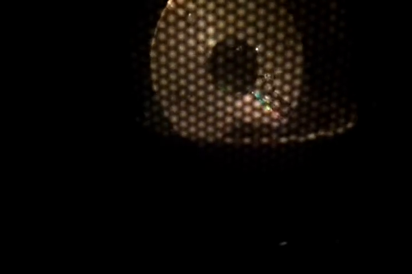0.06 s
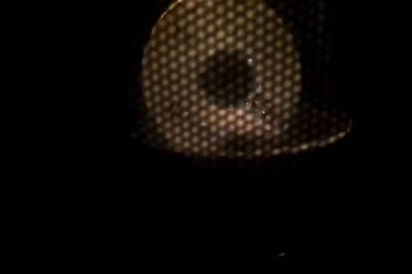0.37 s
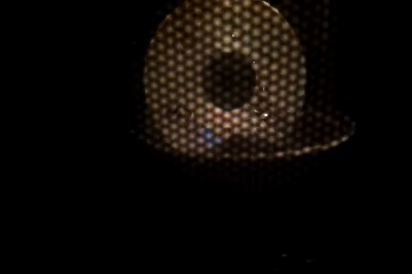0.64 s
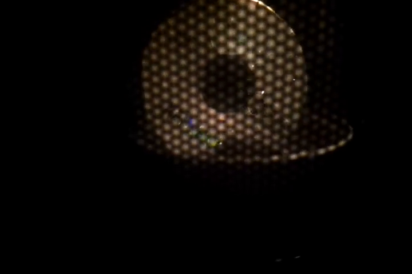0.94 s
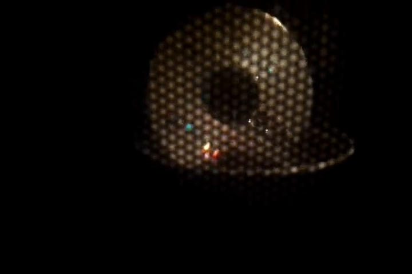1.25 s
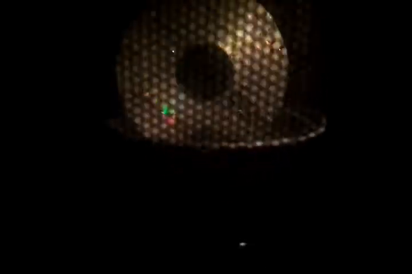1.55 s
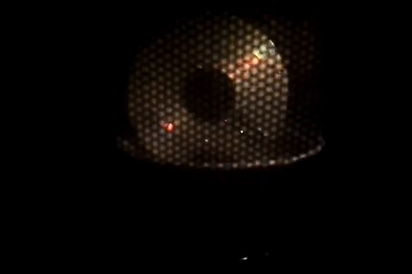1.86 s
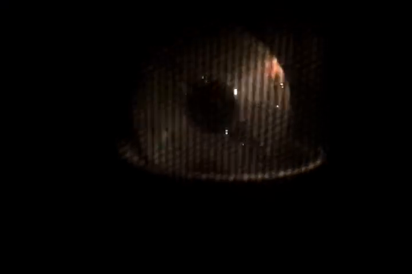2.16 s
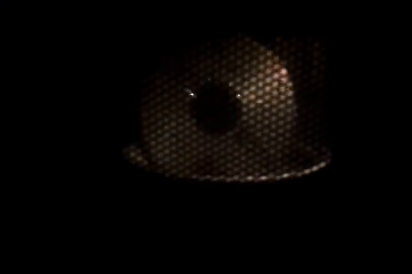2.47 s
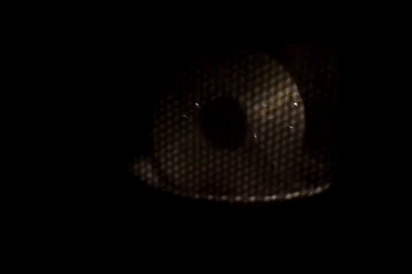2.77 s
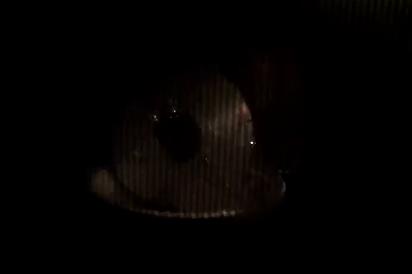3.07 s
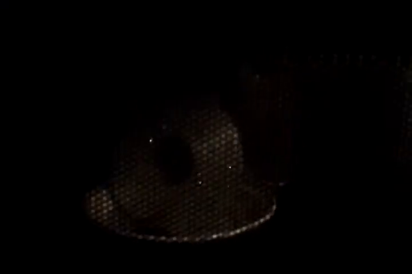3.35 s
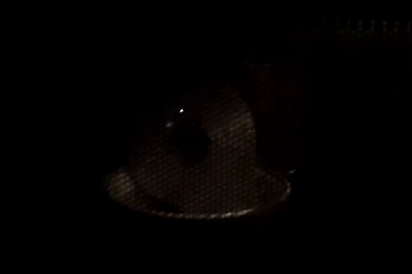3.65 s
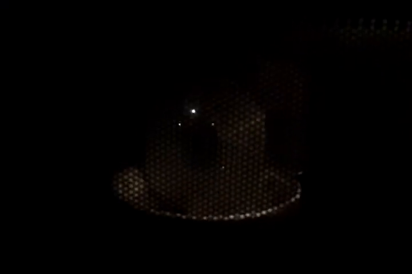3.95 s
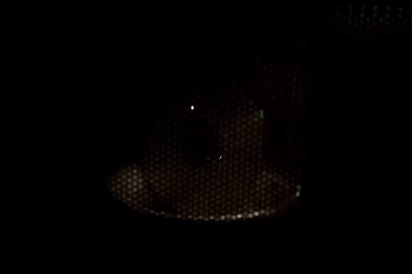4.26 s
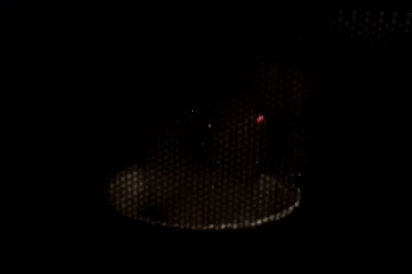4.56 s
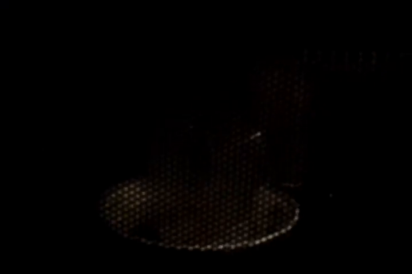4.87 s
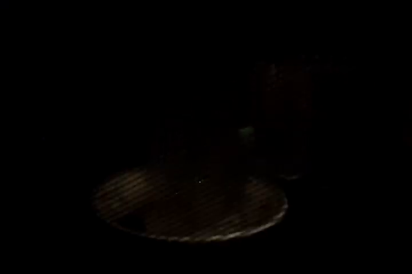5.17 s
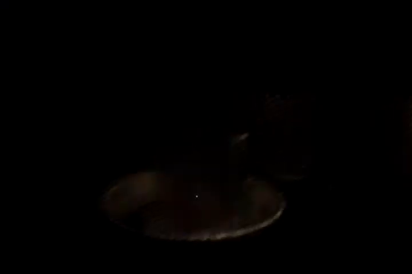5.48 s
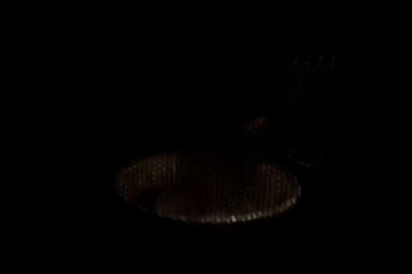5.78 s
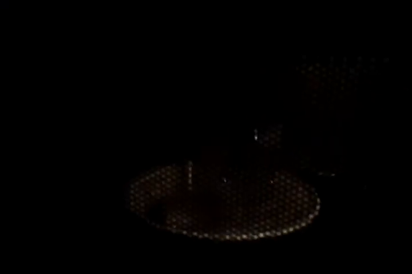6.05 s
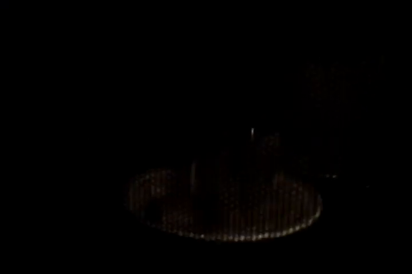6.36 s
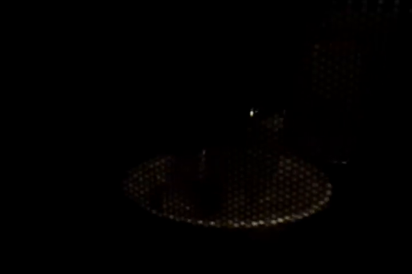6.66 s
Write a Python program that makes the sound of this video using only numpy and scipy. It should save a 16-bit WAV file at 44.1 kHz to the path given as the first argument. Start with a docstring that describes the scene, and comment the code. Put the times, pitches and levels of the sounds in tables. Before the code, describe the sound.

Close to a running microwave oven in a room, a low buzzing hum and the airy noise of the fan continue throughout. Two quick clusters of thin, hissy cracks come from a disc sparking inside, each ringing briefly in the metal cavity. Soft sizzling and a few separate crackles follow, with a single plastic snap. The hum shifts slightly in tone as the microphone moves back, and the crackling stops.

```python
"""A disc in a microwave oven

Heard close to the door, the transformer hums on the 50 Hz mains. The cooling fan adds its own tones
and a rush of air, coloured by the casing. As the magnetron (the part that makes the microwaves) fires,
sparks crackle in the optical disc's metal film and ring on in the steel cavity. The hot plastic snaps."""
import sys
import numpy as np
from scipy import signal
from scipy.fft import rfft, irfft, next_fast_len
from scipy.io import wavfile

SR = 44100
rng = np.random.default_rng(int(sys.argv[2]) if len(sys.argv) > 2 else 0)


def to_wav(s):
    """Save 16-bit WAV."""
    ch = np.atleast_2d(s).T  # columns
    pcm = np.round(np.clip(ch, -1, 1) * 32767)  # PCM
    wavfile.write(sys.argv[1], SR, pcm.astype(np.int16))


N = 305172
TIME = np.arange(N) / SR
FFT_SIZE = next_fast_len(N, True)
BINS_HZ = np.maximum(np.fft.rfftfreq(FFT_SIZE, 1 / SR), 1)
MAINS_HZ = 50.01
CAVITY_RING_S = 0.19   # time to fade by 60 dB

# how far the listener has moved back from the door: t/s, share of the way (0-1)
RETREAT = [(0, 0), (2.8, 0), (3.7, 0.6), (4.5, 0.37), (5.7, 1), (6.92, 0.52)]


def from_db(db):
    """Turn decibels into a gain."""
    return 10 ** (np.asarray(db) / 20)


def rms_one(x):
    """Scale a signal so that its average size (rms) is 1."""
    return x / np.sqrt(np.mean(x ** 2) + 1e-20)


def in_time(points):
    """Join (time, value) points with straight lines, one value a sample."""
    return np.interp(TIME, *np.transpose(points))


def spectrum_db(points):
    """Join (frequency, level) points with straight lines on an octave scale."""
    hz, db = np.transpose(points)
    return np.interp(np.log(BINS_HZ), np.log(hz), db)


def noise(colour_db):
    """Noise with the given level, in dB per Hz, at each frequency."""
    white = rng.standard_normal(FFT_SIZE)
    return irfft(rfft(white) * from_db(colour_db), FFT_SIZE)[:N] * np.sqrt(SR / 2)


def bell(hz, width_hz):
    """The bell-shaped power curve of one resonance, 1 at its peak."""
    return 1 / (1 + (2 * (BINS_HZ - hz) / width_hz) ** 2)


def drift(rate_hz):
    """A smooth random wobble of size about 1; a higher rate moves faster."""
    hop, warm_up = 100, 2000
    pole = np.exp(-2 * np.pi * rate_hz * hop / SR)
    white = rng.standard_normal(N // hop + warm_up + 2)
    smooth = signal.lfilter([1], [1, -2 * pole, pole * pole], white)[warm_up:]
    return np.interp(np.arange(N) / hop, np.arange(len(smooth)), rms_one(smooth))


def tone(turns, multiple, db):
    """A pure tone that swings `multiple` times a turn, from a random starting point."""
    return np.sqrt(2) * from_db(db) * np.sin(2 * np.pi * (multiple * turns + rng.random()))


def dying(age, ring_s):
    """A gain that jumps to 1 at age 0, then fades by 60 dB in ring_s."""
    return (age >= 0) * from_db(-60 * np.clip(age / ring_s, 0, 2))


def spell(start, length, rise_s, fall_s):
    """A gain that rises to 1 at the start, holds, and falls once the length is over."""
    return np.clip((TIME - start) / rise_s, 0, 1) * np.clip(1 - (TIME - start - length) / fall_s, 0, 1)


def lift(x, hz, width_hz, db):
    """Turn one broad band up or down by an amount that changes over time."""
    band = irfft(rfft(x, FFT_SIZE) * bell(hz, width_hz), FFT_SIZE)[:N]
    return x + (from_db(db) - 1) * band


def transformer(waver_db=1.24, gain_db=0.7):
    """The iron core shakes the casing at multiples of the mains; the high tones waver most."""
    # tones of the hum: multiple of the mains, level/dB
    hum_tones = [(1, -53.5), (3, -38), (4, -49.5), (5, -52.5), (7, -64), (8, -52.5), (10, -55), (11, -69.5),
                 (12, -64), (16, -56.5), (18, -62), (20, -62), (22, -56), (28, -64.5), (32, -60), (35, -63),
                 (36, -69.5), (38, -67.5), (39, -70.5), (40, -67), (41, -68.5), (44, -67), (46, -75),
                 (50, -79.5), (61, -80.5), (64, -75.5), (75, -73.5)]
    # standing waves in the room: multiple of the mains, level at the door/dB, change all the way back/dB
    room_tones = [(2, -54, -13), (6, -44, 2), (14, -45.5, -9)]
    turns = MAINS_HZ * TIME
    retreat = in_time(RETREAT)
    hum = sum(tone(turns, k, db + waver_db * np.log10(k) * drift(2.1)) for k, db in hum_tones)
    standing = sum(tone(turns, k, db + change_db * retreat) for k, db, change_db in room_tones)
    return from_db(gain_db) * (hum + standing)


def fan(turns_per_s=40.44, speed_wobble=0.000691, flutter_db=2.5):
    """The motor lags behind the mains, so its blade tone beats against the hum."""
    # fan tones, strongest on multiples of four: multiple of the turning rate, level/dB
    fan_tones = [(3, -63), (4, -48.5), (8, -50.5), (12, -49), (16, -64.5), (18, -64.5), (20, -50.5),
                 (22, -62), (24, -64.5), (28, -54.5), (29, -57.5), (36, -59.5)]
    speed = turns_per_s * (1 + speed_wobble * drift(0.58))
    turns = np.cumsum(speed) / SR
    return sum(tone(turns, k, db + flutter_db * np.log10(k) * drift(4.6)) for k, db in fan_tones)


def rippled_noise(colour_db, spots=6, ripple_db=2.55, step_hz=35, treble_hz=1600):
    """Echoes put fine peaks and dips in the treble, different at each spot the listener passes."""
    depth_db = ripple_db * BINS_HZ ** 2 / (BINS_HZ ** 2 + treble_hz ** 2)
    out = np.zeros(N)
    for here in np.eye(spots):
        heights = rng.standard_normal(4000)
        ripple = np.interp(BINS_HZ / step_hz, np.arange(len(heights)), heights)
        share = np.interp(TIME, np.linspace(0, TIME[-1], spots), here)   # fade from spot to spot
        out += np.sqrt(share) * noise(colour_db + depth_db * ripple)
    return out


def air(buzz_db=0.07, gain_db=-0.33, fade_s=0.23, dull_from_s=5.9):
    """Air swirls through the casing, shaken twice a mains cycle; its colour shifts as the listener moves."""
    # rush of the cooling air: f/Hz, level/dB per Hz
    rush_colour = [(25, -88), (60, -77), (88, -79.5), (135, -71.5), (350, -68), (660, -75), (1000, -73.5),
                   (1550, -78.5), (1900, -78.5), (2800, -84.5), (4700, -88.5), (6500, -90.5), (7300, -99),
                   (8000, -121)]
    # a narrow low throb beside the hum (136 Hz), then resonances of the casing and air duct:
    # f/Hz, width/Hz, boost/dB
    peaks = [(136, 5.6, 9.5), (222.5, 20, 4.5), (408, 27, 0.5), (459, 73, 5.5), (536, 39, 3.5),
             (615, 33, 7.5), (727, 64, 8), (807, 62, 6.5), (925, 76, 5.5), (1113, 73, 3.5),
             (1430, 332, 8.5), (1510, 99, 2), (2560, 34, 5), (3520, 180, 2)]
    # swells in the whirr of the duct: start/s, length/s, boost/dB
    swells = [(2.1, .9, 3.0), (5.1, 1, 2.0)]
    peaks_db = sum(db * bell(hz, width_hz) for hz, width_hz, db in peaks)
    swell_db = sum(db * spell(start, length, fade_s, fade_s) for start, length, db in swells)
    dullness = np.clip((TIME - dull_from_s) / fade_s, 0, 1)
    rush = rippled_noise(spectrum_db(rush_colour) + peaks_db)
    rush = lift(rush, hz=330, width_hz=700, db=1.4 - 2 * in_time(RETREAT))   # less boom farther back
    rush = lift(rush, hz=1430, width_hz=450, db=swell_db - 0.75)   # the whirr swells
    rush = lift(rush, hz=3600, width_hz=630, db=-3 * dullness)   # the hiss dulls near the end
    return rush * from_db(gain_db + buzz_db * np.cos(4 * np.pi * MAINS_HZ * TIME))


def spark_hiss(centre_hz, width_hz, top_ratio=1.36, fall_db_per_octave=60):
    """The broad, bright hiss of a spark, falling away at the top."""
    # the tone shared by all sparks, bright and falling away above 7 kHz: f/Hz, gain/dB
    crackle_colour = [(500, -9), (1500, 3), (3500, 1.5), (4400, 1), (5200, 4), (7100, 3.5), (7600, -5),
                      (8100, -14), (8900, -20.5)]
    octaves_above = np.maximum(np.log2(BINS_HZ / (top_ratio * centre_hz)), 0)
    spark_db = 10 * np.log10(bell(centre_hz, width_hz)) - fall_db_per_octave * octaves_above
    return rms_one(noise(spark_db + spectrum_db(crackle_colour)))


def sparks(width_hz=2700, rasp_db=0.5, build_s=0.00095):
    """Each spark is a short crack that the steel walls smear into a raspy, bright tail."""
    # sparks in the metal film: t/s, level/dB, centre f/Hz
    cracks = [(1.308, -37, 5950), (1.412, -43.5, 5850), (1.492, -40, 6100), (1.513, -44, 6100),
              (1.692, -35.5, 6050), (1.812, -41, 5950), (2.354, -47, 6600), (2.372, -43, 6500),
              (2.413, -46, 6500), (2.470, -49, 6700), (2.553, -40.5, 6300), (3.251, -50, 5400),
              (4.255, -42, 6400), (4.334, -47, 6600), (4.551, -36, 6250), (4.733, -42, 6100),
              (4.792, -50, 6200), (5.032, -39, 6200), (5.153, -39.5, 4700), (5.835, -49, 4000)]
    out, age = np.zeros(N), TIME[:SR // 2]
    rasp = from_db(rasp_db * drift(120))   # echoes arrive in clumps
    tail = dying(age, CAVITY_RING_S) * (1 - np.exp(-age / build_s))
    for start, db, centre_hz in cracks:
        span = slice(round(start * SR), round(start * SR) + len(tail))
        out[span] += from_db(db) * tail * spark_hiss(centre_hz, width_hz)[span]
    return out * rasp


def sizzle(first_firing_s=0.013, uneven_db=2.5, rest_db=-72.5):
    """The magnetron fires once a mains cycle, drawing a tiny spark of random size that rings on."""
    # spells of louder sizzling: start/s, length/s, level/dB
    spells = [(2.36, 0.1, -52), (2.5, 1.4, -60), (4.1, 0.92, -63.5)]
    swell = sum(from_db(db) * spell(start, length, rise_s=0.036, fall_s=0.14)
                for start, length, db in spells)
    loudness = np.hypot(swell, from_db(rest_db))   # a faint sizzle is always there
    cycle = np.floor(MAINS_HZ * (TIME - first_firing_s))
    fires = np.diff(cycle, prepend=0) > 0
    energy = fires * from_db(2 * uneven_db * rng.standard_normal(N))
    kept_per_sample = from_db(-60 / (CAVITY_RING_S * SR)) ** 2
    cavity_energy = signal.lfilter([1], [1, -kept_per_sample], energy)
    return spark_hiss(centre_hz=6100, width_hz=2300) * loudness * rms_one(np.sqrt(cavity_energy))


def snap(ring_s=0.11):
    """The heated plastic snaps, and the disc rings briefly inside the cavity."""
    # the snap of the plastic: t/s, starting level/dB
    snaps = [(4.732, -32)]
    # resonances of the disc: f/Hz, width/Hz, relative level/dB
    resonances = [(1670, 180, 2.5), (2110, 220, -11), (2840, 170, -7.5)]
    power = sum(from_db(2 * db) * bell(hz, width_hz) ** 2 for hz, width_hz, db in resonances)
    loudness = sum(from_db(db) * dying(TIME - start, ring_s) for start, db in snaps)
    return rms_one(noise(10 * np.log10(power))) * loudness


def scene():
    """The running oven and the crackling disc, in one channel."""
    return (transformer() + fan() + air() + sparks() + sizzle() + snap())[None]


def record(dry):
    """Cut the treble steeply above 8900 Hz."""
    low_pass = signal.ellip(10, 0.1, 90, 8900, fs=SR, output="sos")
    return signal.sosfilt(low_pass, dry)


dry = scene()
out = record(dry)
to_wav(out)
```